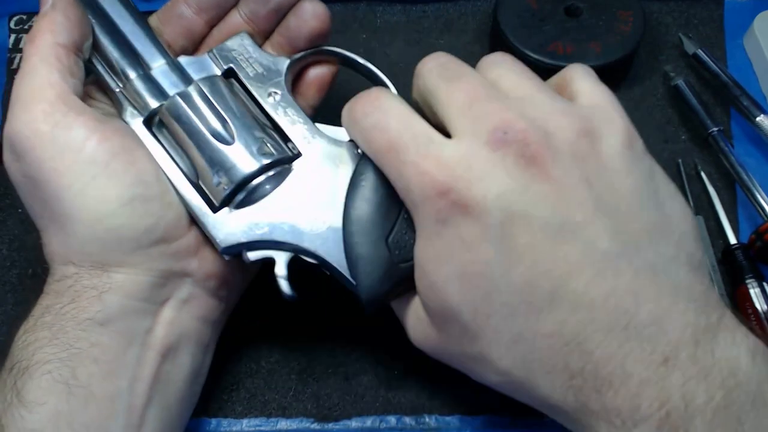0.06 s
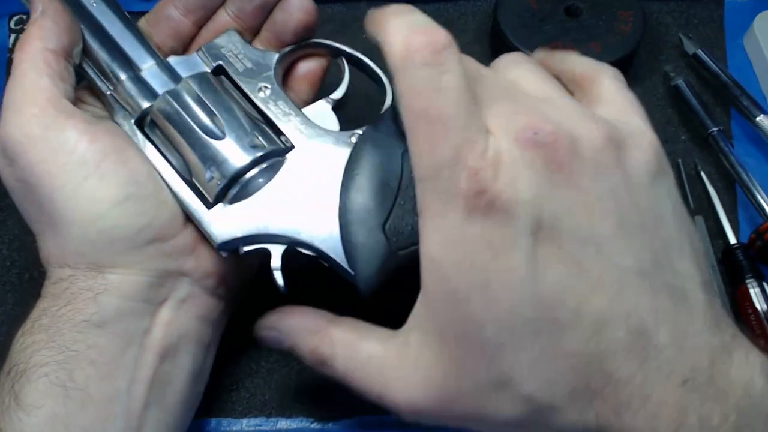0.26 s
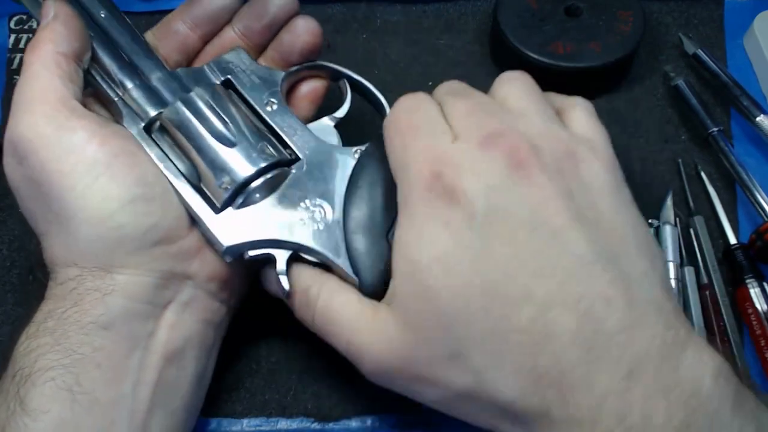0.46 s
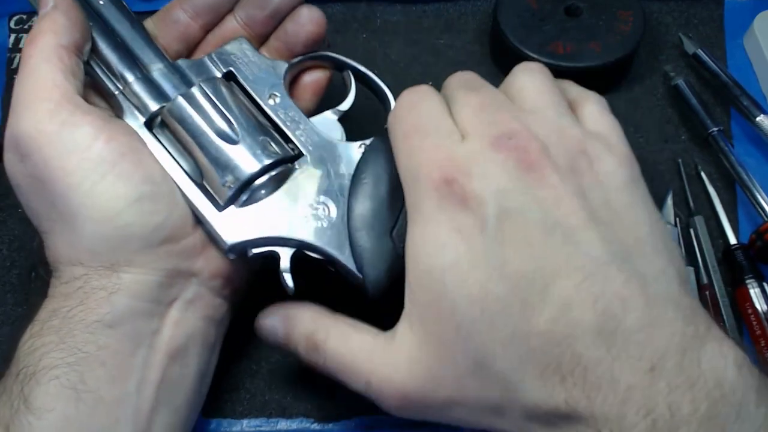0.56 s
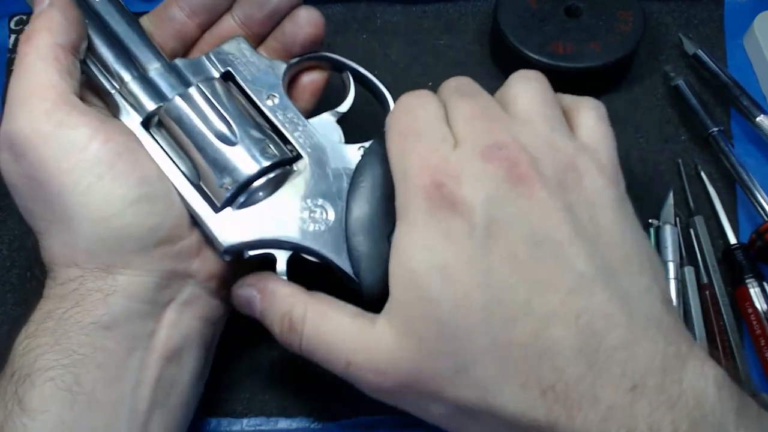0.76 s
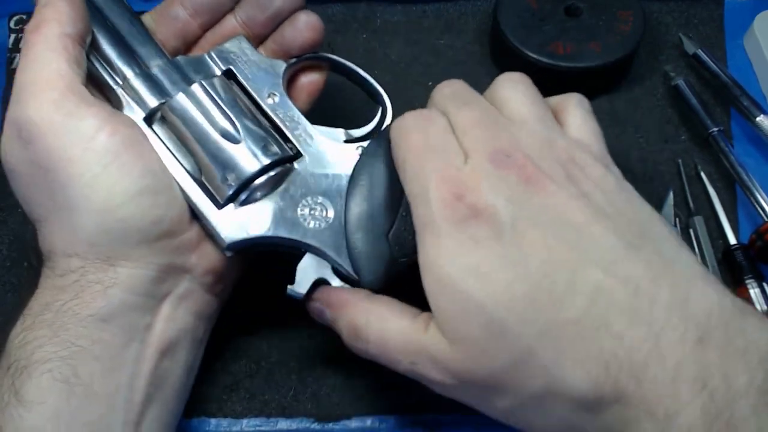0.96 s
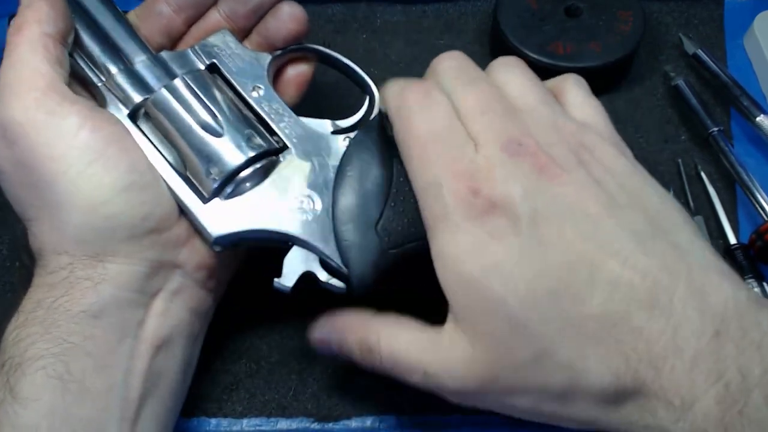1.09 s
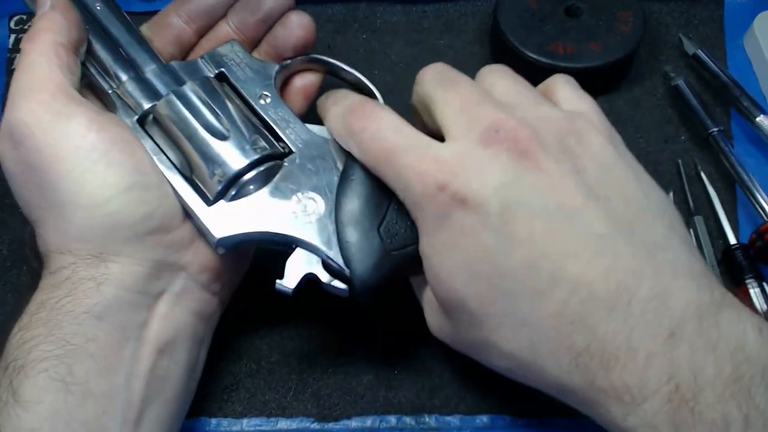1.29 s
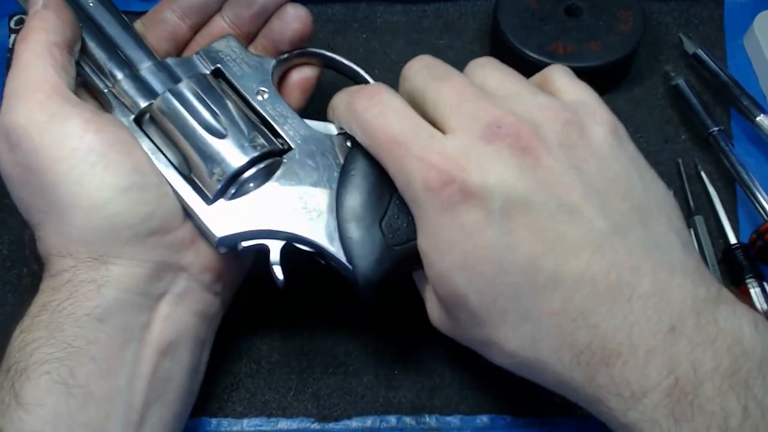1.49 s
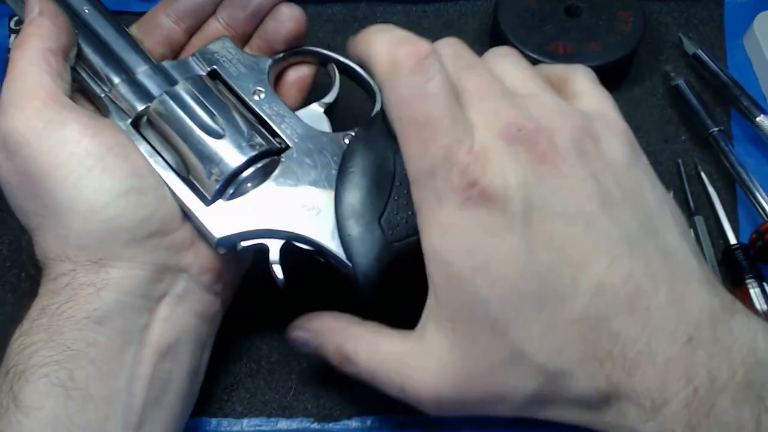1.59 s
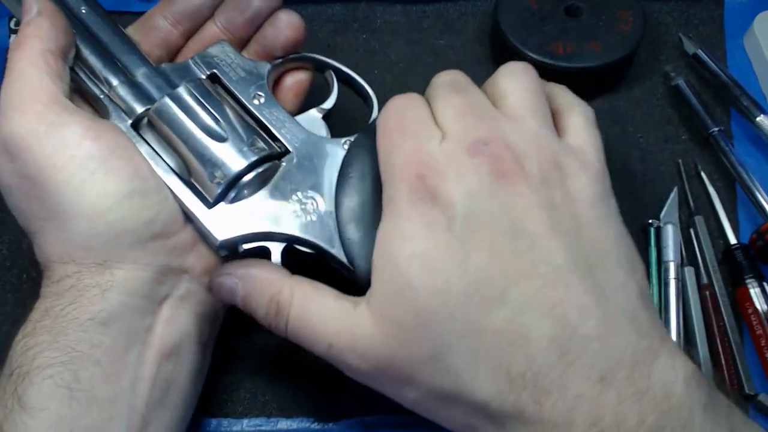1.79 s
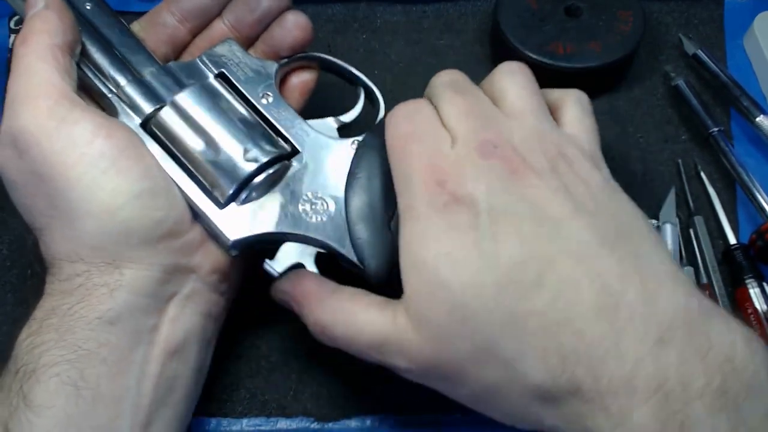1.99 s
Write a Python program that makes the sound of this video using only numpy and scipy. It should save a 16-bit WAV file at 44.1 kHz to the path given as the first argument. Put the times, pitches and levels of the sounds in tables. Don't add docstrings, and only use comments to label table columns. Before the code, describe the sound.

Close, dry metallic clacks from a revolver's hammer and trigger, the loudest slightly overloaded, with crisp cocking clicks midway and tiny ticks in the gaps, over low air and distant fan hum in a small room.

```python
import sys
import numpy as np
from scipy import signal
from scipy.fft import rfft, irfft
from scipy.io import wavfile
from scipy.ndimage import map_coordinates

SR = 44100
rng = np.random.default_rng(int(sys.argv[2]) if len(sys.argv) > 2 else 0)


def waveform_to_disk(signal):
    frames = np.transpose(np.atleast_2d(signal))
    scaled = np.clip(frames, -1, 1) * 32767
    samples = np.round(scaled).astype(np.int16)
    wavfile.write(sys.argv[1], SR, samples)


def ratio_of_db(decibels):
    return 10 ** (np.asarray(decibels, float) / 20)


N = 90404


def hammer_falls():
    blow_times = [.2086, 1.5493]
    stage_leads = [.0062, .0041, 0]
    # level/dB, crack length/s, accent f/Hz
    stages = [
        (-36, .004, 4000),
        (-11, .003, 7500),
        (9.5, 0.014, 8300),
    ]
    # f/Hz, level/dB
    fall_tone = [(120, -49), (200, -9), (791, -19), (1000, -14), (2960, 0.5), (8580, -6), (12200, -3.5),
                 (14300, 4), (16000, -6.5)]
    # f/Hz, level/dB, t60/s
    fall_modes = [(2410, 0.5, 0.042), (3010, -1, 0.082), (3490, -6.5, .06), (3740, -6, 0.095),
                  (7050, 0.5, 0.091), (8120, -1, .07), (8330, 2, 0.046), (12730, -13, .06),
                  (14750, -9, 0.031)]
    rise = 0.0002
    contacts = []
    for blow in blow_times:
        for lead, (db, length, accent_hz) in zip(stage_leads, stages):
            contacts.append((blow - lead, db, length, rise, accent_hz))
    return contact_series(contacts, fall_tone, fall_modes, ring_db=-24, room_db=-12.5)


def trigger_resets():
    # t/s, level/dB, crack length/s, rise/s, accent f/Hz
    resets = [
        (.3395, -34, .004, .002, 7000),
        (.3543, -9, .003, .0004, 8500),
        (1.676, -34, .004, .001, 8000),
        (1.6935, -14, .004, .001, 7500),
        (.3425, -12, .007, .003, 12500),
        (1.6797, -16, .007, .0003, 8500),
        (.3479, 7, .0037, .0002, 6300),
        (1.6853, 4.5, .0034, .0005, 8500),
    ]
    # f/Hz, level/dB
    reset_tone = [(240, -54), (400, -17), (814, -16), (1530, -14), (1960, -12), (3810, -7.5), (12900, -14),
                  (16000, -17.5)]
    # f/Hz, level/dB, t60/s
    reset_modes = [(3800, -8, .1), (6440, -8, 0.079), (7970, -10, .05), (12120, -8.5, 0.0504)]
    return contact_series(resets, reset_tone, reset_modes, ring_db=-20.5, room_db=-23)


def cocking():
    # t/s, level/dB, crack length/s, rise/s, accent f/Hz
    cocks = [
        (1.073, -16, .01, .003, 8000),
        (1.0541, -3, .0026, .0004, 8200),
        (1.0601, -9, .0012, .0002, 8000),
        (1.0654, -3, .0034, .0004, 4000),
    ]
    # f/Hz, level/dB
    cock_tone = [(350, -54), (600, -8.5), (1830, -6.5), (3080, -1), (3830, -13.5), (4710, -8), (8270, -10),
                 (16000, -18)]
    # f/Hz, level/dB, t60/s
    cock_modes = [(1624, -11, 0.035), (3900, 1.5, 0.089), (4410, -17.5, 0.093), (8340, -4, 0.044)]
    return contact_series(cocks, cock_tone, cock_modes, ring_db=-17, room_db=-22.5)


def frame_knocks():
    # t/s, level/dB, f/Hz, t60/s
    knocks = [(.2086, -33.5, 35, 0.092), (.2086, -12, 363, 0.041), (0.2102, -28, 519, .07),
              (.2086, -15, 750, .06), (.2086, -17, 1885, .07), (.3479, -31, 40, .08),
              (.3479, -40, 1050, .04), (1.002, -40, 2650, 0.048), (1.028, -35, 6900, 0.046),
              (1.0541, -16, 874, 0.035), (1.0541, -21.5, 1167, .03), (1.0541, -8, 1640, 0.016),
              (1.0541, -13.5, 2120, 0.023), (1.0667, -34.5, 3900, 0.2), (1.0647, -42, 3750, 0.15),
              (1.5493, -27, 35, .1), (1.5493, -22.5, 350, .08), (1.5493, -35, 1224, 0.046),
              (1.5493, -20, 1980, .07), (1.5493, -6, 3536, .07), (1.6853, -42, 280, .07),
              (1.6853, -21.5, 878, .05), (1.6853, -19, 1400, 0.037), (1.6853, -4, 2450, 0.0178)]
    rise = 0.0006
    out = np.zeros(N)
    t = np.arange(8192) / SR
    onset = 1 - np.exp(-t / rise)
    for s, db, hz, t60 in knocks:
        decay = ratio_of_db(db - 60 * t / t60)
        add(out, s, decay * np.sin(2 * np.pi * hz * t) * onset)
    return out


def lockwork_ticks():
    # t/s, level/dB, length/s, colour f/Hz, colour width/ln Hz
    ticks = [(0.524, -57.5, 0.0063, 6950, 0.69), (.595, -55.5, .01, 6000, 0.43),
             (0.662, -57, 0.0073, 7000, 0.71), (.697, -57, 0.00807, 11000, 1.1),
             (0.964, -53.5, 0.0032, 8250, 0.15), (.968, -56.5, .02, 8000, 0.62),
             (.9788, -49.5, 0.0014, 10100, 0.57), (0.983, -41.5, 0.0021, 14100, 0.38),
             (.9835, -42, 0.0034, 7900, 0.16), (0.989, -41, 0.0035, 9500, 0.3),
             (1.0006, -36, 0.0047, 7900, .6), (1.003, -36.5, 0.0049, 3800, 0.85),
             (1.0228, -21, 0.0043, 6600, 1.3), (1.0229, -30.5, 0.0027, 14800, .3),
             (1.2135, -45, 0.0021, 9000, 2.3), (1.2345, -56, .004, 9100, 0.15),
             (1.2822, -35, 0.0042, 1090, 0.2), (1.283, -58, 0.0036, 5000, 0.66),
             (2.041, -26.5, 0.0031, 3700, 1.3)]
    out = np.zeros(N)
    for s, db, length, colour_hz, width in ticks:
        colour = lambda hz: bell(hz, colour_hz, width)
        add(out, s, ratio_of_db(db) * click(colour, length, rise=0.000067, room_db=-20.5))
    return out


def contact_series(contacts, tone, modes, ring_db, room_db):
    out = np.zeros(N)
    gain = lambda hz: ratio_of_db(along(tone, hz))
    for s, db, length, rise, accent_hz in contacts:
        sound = click(gain, length, rise, room_db, modes, ring_db, accent_hz, accent_db=12)
        add(out, s, ratio_of_db(db) * sound)
    return out


def click(gain, length, rise, room_db, modes=(), ring_db=0, accent_hz=8000, accent_db=0):
    accent_width, ring_blur_hz, steel_low_hz = 0.099, 60.18, 720
    t = np.arange(16384) / SR
    onset = 1 - np.exp(-(t / rise) ** 2)
    struck = lambda hz: gain(hz) * ratio_of_db(accent_db * bell(hz, accent_hz, accent_width))
    chatter = noise(len(t), struck) * np.exp(-(t / length) ** 3) * onset / 2
    out = chatter + ratio_of_db(room_db) * tail(len(t), gain)
    for mode_hz, db, t60 in modes:
        resonance = lambda hz: 1 / (1 + ((hz - mode_hz) / ring_blur_hz) ** 2)
        decay = ratio_of_db(ring_db + db - 60 * t / t60)
        out = out + onset * decay * noise(len(t), resonance)
    high_pass = signal.butter(4, steel_low_hz, "high", fs=SR, output="sos")
    return signal.sosfilt(high_pass, out)


def trigger_drags():
    # start t/s, length/s, level/dB, fall/s
    pulls = [
        (0, 0.1, -40.5, 0.054),
        (1.27, 0.1136, -42, 0.009),
    ]
    # f/Hz, level/dB
    drag_tone = [(500, -12), (850, 3), (1200, 7), (1800, -6), (3000, -21), (7000, -22), (15000, -30.5),
                 (17000, -38)]
    rise_share, rough_db = 0.49, 1.5
    t = np.arange(N) / SR
    swell = np.zeros(N)
    for s, length, db, fall in pulls:
        attack = np.clip((t - s) / (rise_share * length), 0, 1)
        release = np.clip((s + length - t) / fall, 0, 1)
        swell += ratio_of_db(db) * attack * release
    roughness = ratio_of_db(rough_db * wobble(120))
    return swell * roughness * noise(N, lambda hz: ratio_of_db(along(drag_tone, hz)))


def springs():
    # start t/s, length/s, f/Hz, level/dB
    songs = [
        (.1, 0.14, 1620, -60),
        (1.413, 0.1, 1585, -59),
        (2, .25, 15000, -75),
        (.45, .4, 29000, -86),
    ]
    width_hz = 33
    t = np.arange(N) / SR
    out = np.zeros(N)
    for s, length, song_hz, db in songs:
        swell = np.sin(np.pi * np.clip((t - s) / length, 0, 1))
        out += ratio_of_db(db) * swell * noise(N, lambda hz: np.exp(-((hz - song_hz) / width_hz) ** 2))
    return out


def room_air():
    # f/Hz, level/dB
    air_tone = [(12, -31), (20, -2), (168, -5.5), (193, -13.5), (216, -7), (485, -9), (780, -18.5),
                (1000, -16.5), (16000, -48.5)]
    level_db = -45.5 - 1.5 + 0.66 * wobble(2.2)
    return ratio_of_db(level_db) * noise(N, lambda hz: ratio_of_db(along(air_tone, hz)))


def far_fan():
    # f/Hz, width/Hz, level/dB
    fan_bands = [(251, 70, -54), (345, 49, -55), (1020, 210, -61)]
    out = np.zeros(N)
    for band_hz, width_hz, db in fan_bands:
        band = noise(N, lambda hz: np.exp(-((hz - band_hz) / width_hz) ** 2))
        out += ratio_of_db(db + wobble(4.1)) * band
    return out


def tail(size, gain):
    # f/Hz, t60/s
    room_decay = [(400, 0.24), (1500, 0.13), (4000, 0.16), (8000, .16), (15000, .13)]
    gap = 0.0045
    hz, t, z = signal.stft(noise(size, gain), SR, nperseg=128)
    decay = ratio_of_db(-60 * t / along(room_decay, hz)[:, None])
    field = signal.istft(z * decay, SR, nperseg=128)[1][:size]
    return field * (1 - np.exp(-(np.arange(size) / SR / gap) ** 2))


def unit(x):
    return x / np.sqrt(np.mean(x ** 2) + 1e-20)


def along(points, hz):
    f, v = np.transpose(points)
    return np.interp(np.log(hz + 1), np.log(f + 1), v)


def bell(hz, centre_hz, width):
    return np.exp(-(np.log(hz / centre_hz + 1e-9) / width) ** 2)


def noise(size, gain):
    spectrum = rfft(rng.standard_normal(size))
    return unit(irfft(spectrum * gain(np.fft.rfftfreq(size, 1 / SR)), size))


def wobble(rate):
    knots = rng.standard_normal(int(N * rate / SR) + 4)
    return map_coordinates(knots, [np.arange(N) * rate / SR])


def add(track, s, sound):
    part = track[round(s * SR):][:len(sound)]
    part += sound[:len(part)]


def scene():
    impacts = hammer_falls() + trigger_resets() + cocking() + frame_knocks() + lockwork_ticks()
    friction = trigger_drags() + springs()
    background = room_air() + far_fan()
    return (impacts + friction + background)[None]


def top_cut(x):
    return signal.sosfilt(signal.butter(12, 17060, fs=SR, output="sos"), x)


def record(dry):
    clip_top, clip_hard = 0.57, 10
    top_hz, edge_hz, leak_db = 15750, 50, -38
    overloaded = dry / (1 + np.abs(dry / clip_top) ** clip_hard) ** (1 / clip_hard)
    hz = np.fft.rfftfreq(N, 1 / SR)
    low_pass = 1 / (1 + np.exp(np.clip((hz - top_hz) / edge_hz, -50, 50)))
    mix = irfft(rfft(overloaded) * (ratio_of_db(leak_db) + low_pass), N)
    return top_cut(mix)


dry = scene()
out = record(dry)
waveform_to_disk(out)
```